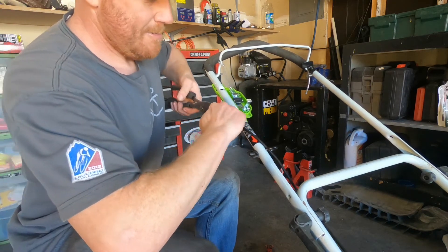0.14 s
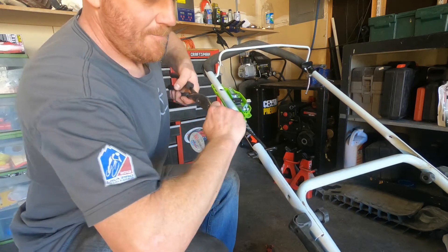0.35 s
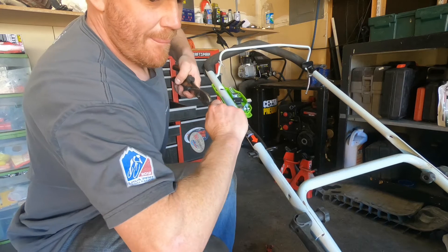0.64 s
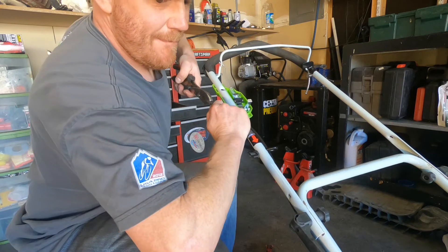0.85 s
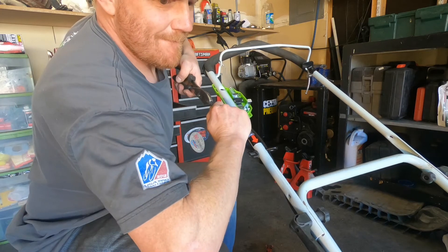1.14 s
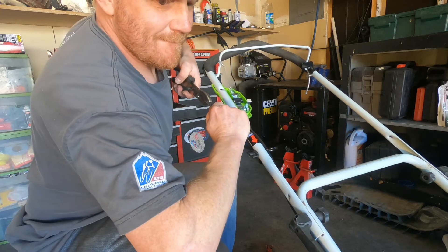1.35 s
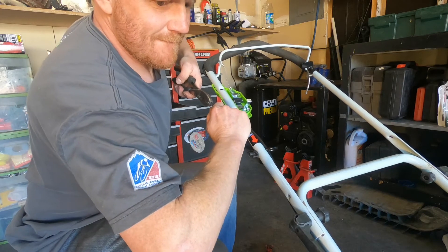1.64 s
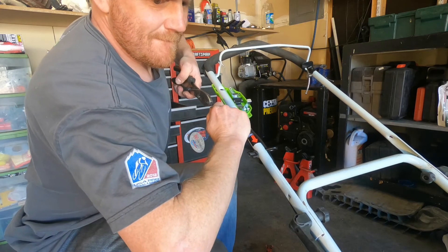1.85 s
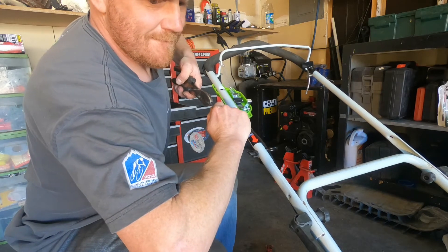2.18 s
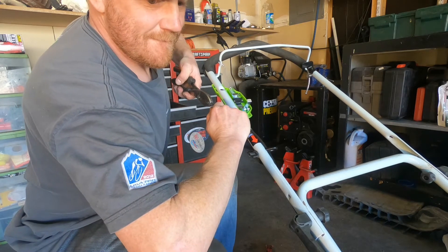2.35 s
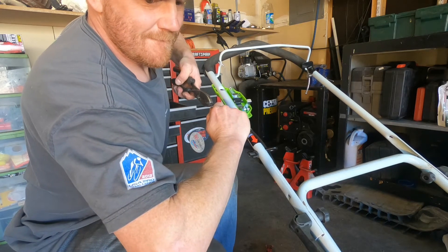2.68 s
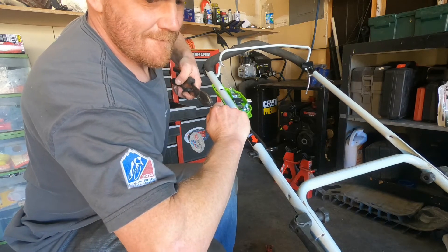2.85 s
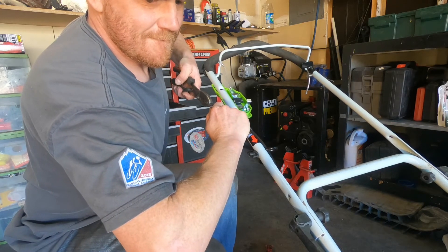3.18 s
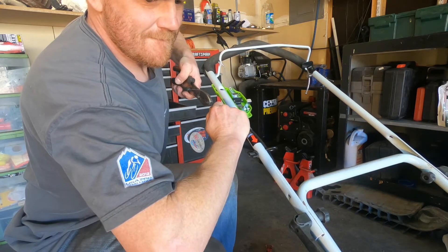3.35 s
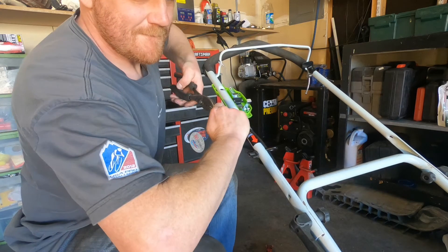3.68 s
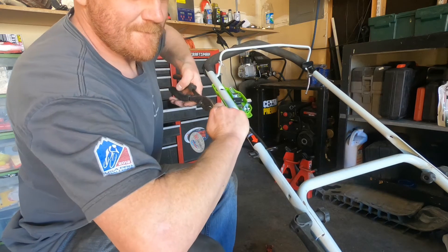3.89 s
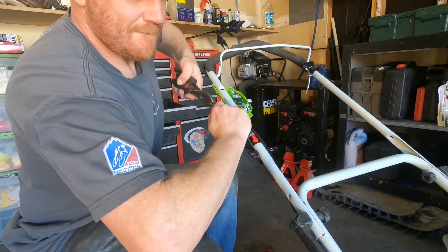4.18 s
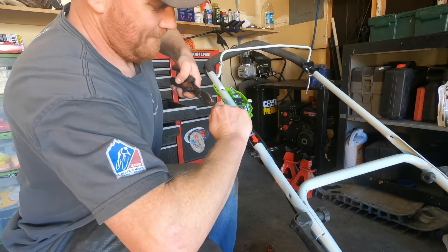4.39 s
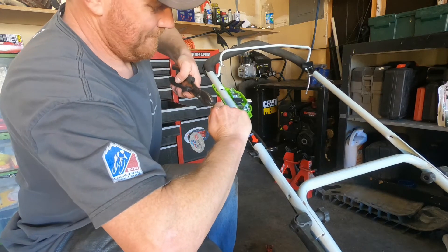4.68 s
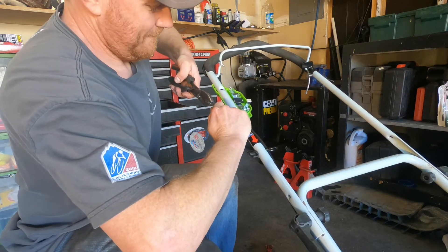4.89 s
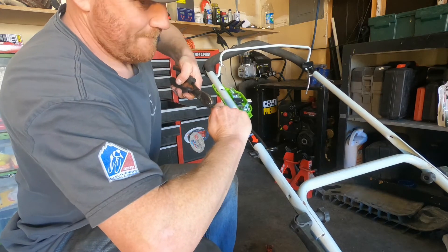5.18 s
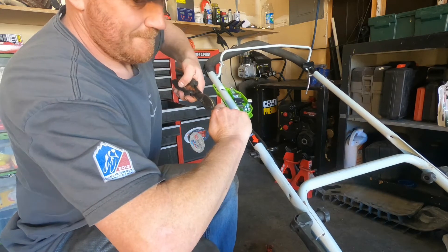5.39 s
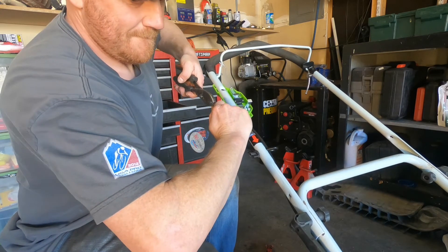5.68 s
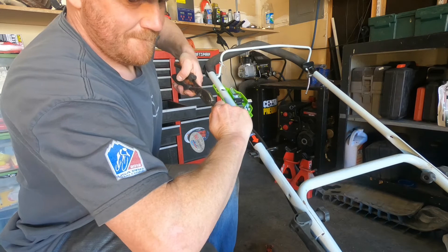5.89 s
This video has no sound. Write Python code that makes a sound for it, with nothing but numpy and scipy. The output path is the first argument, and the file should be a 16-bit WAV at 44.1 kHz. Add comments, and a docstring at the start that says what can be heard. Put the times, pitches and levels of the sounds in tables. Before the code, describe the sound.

Close in a garage, faint scrapes and dull bumps on the right lead to a hard clack. An electric mower starts, knocking slowly then faster, booming in its deck as hum and rushing air climb to full speed. The brake stops it abruptly with a shudder and clacks. After a near-quiet pause and another clack, a second spin-up is cut short, ending in sharp mechanical clacks.

```python
"""In a garage, an electric lawn mower is switched on twice by someone working at its handle with a hand tool.
A clack, then the blade spins up: it knocks once a turn, booms in the deck, hums and throws a rush of air.
The brake stops it hard; the second start is cut short. Struck modes and a noise tail follow each clack.
Dull bumps on the right and light scrapes come mostly at the start. Shaped noise and shaft orders follow
one computed shaft speed, heard by two microphone ports."""
import sys
import numpy as np
from scipy import signal
from scipy.fft import rfft, irfft
from scipy.io import wavfile
from scipy.ndimage import uniform_filter1d

SR = 44100
rng = np.random.default_rng(int(sys.argv[2]) if len(sys.argv) > 2 else 0)


def file_out(sig):
    """Save sig as 16-bit WAV at sys.argv[1]."""
    # one column per channel
    cols = np.atleast_2d(sig).T
    # limit, then scale
    lim = np.clip(cols, -1, 1)
    pcm = np.round(lim * 32767).astype(np.int16)
    wavfile.write(sys.argv[1], SR, pcm)


N = 266011
TIME, FREQ = np.arange(N) / SR, np.maximum(np.fft.rfftfreq(N, 1 / SR), 1)

# each run of the motor: switched on t/s, brake grabs t/s, brake jolt level/dB, shaft hum level/dB
RUNS = [(0.859, 3.49, -24.5, 0.5), (4.395, 5.287, -27, -15)]
FULL_SPEED = 100.4  # turns per s
RELEASE_S = 0.22  # the motor's pull dies away over this time


def undb(db):
    """Decibels to gain."""
    return 10 ** (np.asarray(db) / 20)


def over_hz(points):
    """Join (f/Hz, value) points on a log-frequency axis."""
    hz, value = np.transpose(points)
    return np.interp(np.log(FREQ), np.log(np.maximum(hz, 1)), value)


def resonance(hz, width_hz, at_hz=FREQ):
    """Gain of one resonance at the given frequencies."""
    return 1 / np.hypot(1, (at_hz / hz - hz / at_hz) * hz / width_hz)


def resonances(modes):
    """Summed gain of (f/Hz, width/Hz, level/dB) modes, each a squared resonance."""
    return sum(undb(db) * resonance(hz, width) ** 2 for hz, width, db in modes)


def below(hz):
    """Gain of a steep low-pass."""
    return 1 / np.hypot(1, (FREQ / hz) ** 6)


def above(hz):
    """Gain of the matching high-pass."""
    return np.sqrt(1 - below(hz) ** 2)


def noise(gain):
    """Two unrelated noises of rms 1 with this gain over frequency."""
    x = irfft(rfft(rng.standard_normal((2, N))) * gain, N)
    return x / x.std()


def walk(rate):
    """Two random wanderings of spread 1, no faster than about rate Hz."""
    return noise(below(rate))


def fade(start, t60, rise=0.00055):
    """Envelope of something struck at start: a quick rise, then an exponential decay."""
    age = np.maximum(TIME - start, 0)
    return (1 - np.exp(-age / rise)) * undb(-60 * np.minimum(age / t60, 4))


def ramp(x, lo, hi):
    """Straight line from 0 at lo to 1 at hi, held beyond."""
    return np.clip((x - lo) / (hi - lo), 0, 1)


def standing_waves(spacing_hz, depth_db):
    """Reflections in the garage lift and sink narrow bands; gliding tones swell as they cross them."""
    knots = np.arange(0, SR / 2 + 100, spacing_hz)
    gain = undb(depth_db * np.interp(FREQ, knots, rng.standard_normal(len(knots))))
    return gain / np.sqrt(np.mean(gain ** 2))


def still_garage():
    """The faint noise floor of the still garage."""
    # colour: f/Hz, relative level/dB
    garage_colour = [(25, -0.5), (50, -2.5), (85, -18.5), (175, -1), (400, -11), (700, -13.5),
                     (1000, -20.5), (2200, -24), (4000, -27), (6300, -28), (10000, -41.5), (15000, -53)]
    return undb(-61.5) * noise(undb(over_hz(garage_colour)))


def early_hiss():
    """A faint treble hiss swells and sinks around 0.3 s: band noise under a bell-shaped envelope."""
    # middle t/s, level/dB, half-length to 1/e /s, centre f/Hz, width/Hz
    hiss_swell = (0.3, -68, 0.35, 3000, 3200)
    middle, db, length, hz, width = hiss_swell
    return undb(db) * np.exp(-((TIME - middle) / length) ** 2) * noise(resonance(hz, width) ** 2)


def bumps(thud_t60=0.2):
    """Dull bumps on the right: a low thud and a few booming modes, some damped sooner than others."""
    # soft bumps: t/s, relative level/dB, ring t60/s
    bump_list = [(0.297, -31, 0.36), (0.527, -25, 0.27), (.555, -32.5, 0.16), (.597, -40, 0.16),
                 (5.829, -48.5, 0.37)]
    # what a bump rings with: f/Hz, relative level/dB, share of the ring t60
    bump_modes = [(40, -17, 4.5), (71.5, 3, 1.1), (154, -8.5, 1.2), (191, -1.5, 0.54)]
    thud_colour = [(20, -39), (45, 7.5), (80, 1.5), (115, -22), (175, -2.0), (300, -10.5), (600, -30.0),
                   (2000, -78)]
    thud = noise(undb(over_hz(thud_colour)))
    out = 0
    for start, db, ring_t60 in bump_list:
        boom = 0
        for hz, mode_db, share in bump_modes:
            tone = np.sin(2 * np.pi * hz * (TIME - start))
            boom = boom + undb(mode_db) * tone * fade(start, share * ring_t60, rise=0.027)
        struck = undb(-1.5) * thud * fade(start, thud_t60, rise=0.002)
        out = out + undb(db) * (struck + undb(3.0) * boom)
    return out * undb(np.array([[-7], [3.5]]))  # left, right


def scrapes_and_ticks(grain_db=4, rise_s=0.002):
    """Light scrapes at the start, then short ticks and knocks as the mower starts up: grainy bursts of band noise."""
    # scrapes, ticks and knocks: t/s, relative level/dB, decay to 1/e /s, centre f/Hz, width/Hz
    burst_list = [(0.17, -52, 0.065, 545, 200), (0.19, -60, 0.053, 2780, 700),
                  (0.208, -56.5, 0.044, 1870, 350), (0.21, -60, 0.008, 2620, 500),
                  (0.25, -49, 0.035, 645, 380), (0.265, -48.5, 0.016, 1550, 600),
                  (0.286, -55.5, 0.025, 1350, 800), (0.565, -54, 0.025, 2000, 1200),
                  (0.91, -49, 0.0049, 3640, 3000), (1.073, -49, 0.012, 1320, 1110),
                  (1.121, -48, .007, 1700, 1200), (4.446, -46, .012, 715, 480)]
    bursts = 0
    for start, db, length, hz, width in burst_list:
        envelope = fade(start, length * np.log(1000), rise=rise_s)
        bursts = bursts + undb(db) * envelope * noise(resonance(hz, width) ** 2)
    return bursts * undb(grain_db * walk(170)[0] - 4.5)


def clacks(crack_t60=0.038, room_t60=0.46, treble_t60=0.32, low_t60=0.6, low_late_s=0.0036, build_cycles=1.8):
    """Each clack: a short crack, the mower's struck modes, and the garage's tail; the lows swell late."""
    # clacks of the switch, the mechanism and the tool: t/s, relative ring level/dB,
    # relative noise level/dB, treble over that noise/dB, crack over the tail/dB
    clack_list = [(0.552, -48, -51, -17.5, 14.5), (0.725, -26, -34, -10.5, 7.5),
                  (3.713, -28.5, -30.5, -18, 14), (3.818, -31, -40, -26, 16), (3.875, -59, -49, -39, 6),
                  (4.14, -58, -48, -19.5, 9), (4.252, -25, -34.5, -12.5, 9.5), (4.446, -64, -56, -32, -5),
                  (5.289, -23, -27.5, -13.5, 11), (5.794, -26.5, -35, -10.5, 7.5)]
    # colour of a clack: f/Hz, relative level/dB
    clack_colour = [(90, -43), (170, 9), (380, 4.5), (480, 1), (600, -10), (720, -6), (950, -13),
                    (1500, -15), (1900, -14.5), (2550, -24), (3100, -24.5), (4300, -26.5), (6000, -21.5),
                    (8700, -33.5), (15000, -53)]
    # what the mower rings with when struck: f/Hz, relative level/dB, t60/s
    body_modes = [(184.8, 4.5, 0.52), (273.3, 5, 0.17), (356.7, 7.5, 0.29), (418, -7, 0.55),
                  (453, 5.5, 0.2), (508, -2.5, 0.25), (698, 6, 0.15), (1102, -1.5, 0.33), (1508, 0.5, 0.31),
                  (1680, -2, 0.24), (1876, 1.5, 0.14), (1870, -7, 0.44), (2116, -7, 0.36),
                  (2808, -17, 0.15)]
    colour = undb(over_hz(clack_colour))
    low = noise(colour * below(570))
    middle = noise(colour * above(491) * below(3400))
    treble = noise(colour * above(2640))
    age = TIME[:SR]
    out = np.zeros((2, N))
    for start, ring_db, body_db, treble_db, crack_db in clack_list:
        crack = undb(crack_db) * fade(start - .002, crack_t60, rise=0.0012)
        out += undb(body_db - 6.0) * low * fade(start + low_late_s, low_t60, rise=0.0022)
        out += undb(body_db - 5.0) * middle * (crack + fade(start, room_t60, rise=0.0027))
        out += undb(body_db + treble_db - 0.5) * treble * (crack + fade(start, treble_t60, rise=0.0077))
        ring = 0
        for hz, db, t60 in body_modes:
            # each strike detunes the mode slightly and starts it at its own phase
            cycles = hz * age * (1 + 0.004 * rng.standard_normal()) + rng.random()
            build = 1 - np.exp(-age * hz / build_cycles)
            ring = ring + undb(db - 60 * age / t60) * build * np.sin(2 * np.pi * cycles)
        first = int(start * SR)
        out[:, first:first + SR] += undb(ring_db - 20.5) * ring[:N - first]
    return out


def blade_ring(start=3.8, hz=300, t60=4):
    """The steel blade rings on faintly after the brake has grabbed: one slowly decaying sine."""
    return undb(-55.0) * np.sin(2 * np.pi * hz * TIME) * fade(start, t60, rise=0.035)


def brake_jolts(t60=0.43):
    """Each time the brake grabs, the whole chassis shudders: low noise that dies away."""
    shudder_colour = [(60, -42), (100, -10), (165, 10.5), (250, -10), (450, 3.0), (650, 3.5), (1000, -35),
                      (3000, -60)]
    shudder = noise(undb(over_hz(shudder_colour)))
    return shudder * sum(undb(db) * fade(off, t60, rise=0.0017) for _, off, db, _ in RUNS)


def shaft():
    """Speed (turns per s), angle (turns) and the motor's pull (0-1): a steady climb, a level top, a hard stop."""
    # the climb hesitates: t/s after switch-on, half-length to 1/e /s, speed lost/(turns per s)
    hesitation = (1.12, .22, 2.2)
    slow_at, slow_s, lost = hesitation
    spin_up_rate = 61  # turns per s, each s: the controller raises the speed steadily
    level_off = 7.6  # sharpness of the bend into full speed
    waver_hz, waver_share = 9, .007  # the fast shaft wavers by this share of its speed
    brake_delay_s, brake_s = 0.0276, 0.5  # delay before the brake bites, time constant of its drag
    friction = 100 * brake_s  # dry friction slows the shaft by a further 100 turns per s, each s
    speed, turns, pulling = np.zeros((3, N))
    for on, off, _, _ in RUNS:
        climb = spin_up_rate * np.clip(TIME - on, 0, off - on)
        driven = climb / (1 + (climb / FULL_SPEED) ** level_off) ** (1 / level_off)
        driven = driven - lost * np.exp(-((climb / spin_up_rate - slow_at) / slow_s) ** 2)
        driven = driven * (1 + waver_share * walk(waver_hz)[0] * ramp(driven, 38.4, 60.7))
        braked_s = np.maximum(TIME - off - brake_delay_s, 0)
        run = np.maximum((driven + friction) * np.exp(-braked_s / brake_s) - friction, 0)
        speed = speed + run
        turns = turns + np.cumsum(run) / SR * (run > 0)
        pulling = pulling + (TIME > on) * (1 - ramp(TIME, off, off + RELEASE_S))
    return speed, turns, pulling


def loudness(law, speed, pulling):
    """Level in dB of a layer that grows as a power of the speed and changes as the motor's pull dies away."""
    full_db, slope_db, released_db = law
    return full_db + slope_db * np.log10(np.maximum(speed / FULL_SPEED, 1e-4)) + released_db * (1 - pulling)


def shaft_tone(turns, order, smear):
    """One multiple of the shaft rate: a steady part and a share smeared by turbulence."""
    smear = np.clip(smear, 0, .9)
    angle = 2 * np.pi * (order * turns + rng.random())
    steady = np.sqrt(2 * (1 - smear ** 2)) * np.sin(angle)
    return steady + smear * (walk(24 + order) * np.sin(angle) + walk(11 + 2 * order) * np.cos(angle))


def drive_whine(speed, pulling, buzz_db=-56.5, glide_hz=40):
    """As the motor pulls up from rest, its controller sings and hisses faintly; the housing buzz rises a little."""
    starting = pulling * ramp(speed, 1, 15.0) * (1 - ramp(speed, 33.0, 69))
    whine = undb(-77.5) * ramp(speed, 0, 21) * noise(resonance(9950, 200) ** 2)
    sizzle = undb(-68.5) * noise(resonance(6000, 2700) ** 2)
    buzz_hz = 575 + glide_hz * ramp(speed, 3.32, 17)
    buzz = undb(buzz_db) * shaft_tone(np.cumsum(buzz_hz) / SR, 1, 0.65)
    rough = undb(-56) * noise(resonance(548, 150) ** 2)
    return starting * (whine + sizzle + buzz + rough)


def hum(speed, turns, pulling, waver=0.26, smear_per_order=0.089, upper_db=-2.0, released_db=-30,
        third_throb=0.26, third_smear=0.28, beat_db=2.0):
    """Shaft orders, the second strongest from the two blade ends, beating on the climb; they fade with the pull."""
    # weaker tones: multiple of the shaft rate, relative level/dB
    weaker_tones = [(1, -45.5), (4, -38.5), (5, -41), (6, -40.5), (7, -46), (8, -37.5), (10, -40.5),
                    (12, -42), (14, -41.5), (16, -45), (18, -45), (20, -48.5), (24, -46)]
    # resonances that lift the tones gliding through: f/Hz, width/Hz, level/dB
    lifts = [(100, 8, -3), (125, 3.2, -12.5), (176.3, 10, 6), (192.2, 10.2, 3), (256.8, 8.7, 17),
             (289, 8.6, 2), (353, 25, 4), (461, 23, 5.5), (528, 20, -6), (596, 19, -4.5), (820, 40, -1.5),
             (1035, 32, 2.5)]
    blade_db, third_db = -35, -43  # second and third order, relative levels
    surge_hz, surge_db = 8, 2.8  # each weaker tone swells and sinks on its own
    # the blade tone throbs while the speed settles: strongest at, lasting about, rate, depth
    throb_at_s, throb_span_s, throb_hz, throb_depth_db = 2.712, 0.48, 4.18, 5

    drive = (speed / FULL_SPEED) ** 0.27 * undb(released_db * (1 - pulling))
    sounding = 0
    for on, off, _, hum_db in RUNS:
        fading = 1 - ramp(TIME, off + RELEASE_S, off + 2 * RELEASE_S)
        sounding = sounding + undb(hum_db) * (TIME > on) * fading
    drive = drive * sounding

    upper = 0
    for order, db in weaker_tones:
        surge = undb(db + surge_db * walk(surge_hz)[0])
        upper = upper + surge * shaft_tone(turns, order, waver + smear_per_order * order)
    upper = rfft(drive * ramp(speed, 43.0, 81) * upper)
    upper = upper * above(39) * standing_waves(spacing_hz=7.7, depth_db=3.5)

    settling = TIME - throb_at_s
    throb_db = throb_depth_db * np.cos(2 * np.pi * throb_hz * settling)
    throb_db = throb_db * np.exp(-(settling / throb_span_s) ** 4)
    blade = undb(blade_db + throb_db) * shaft_tone(turns, 2, waver)
    # the extra smear of the third order grows as the speed falls from 110 to 96 turns per s
    third = shaft_tone(turns, 3, waver + third_smear * ramp(speed, 110, 96))
    third = undb(third_db + third_throb * throb_db) * third
    beating = undb(beat_db * walk(9.7)[0] * (1 - ramp(speed, 68, 83)))
    main = rfft((blade + third) * drive * ramp(speed, 39.3, 72.4) * beating)
    lift = 1 + resonances(lifts)
    return irfft(main * lift + undb(upper_db) * upper * lift ** above(244), N)


def knocks(turns, speed, knock_s=0.0065, soft_s=0.0017, rebound=0.27, scatter_db=0.8):
    """The slow shaft knocks once a turn and rebounds half a turn later, varying in size; speed blurs the knocks."""
    halves = 2 * (turns + 0.45)
    stroke = halves.astype(int)
    size = undb(scatter_db * rng.standard_normal(2048))[stroke] * np.where(stroke % 2, rebound, 1)
    since = halves % 1 / np.maximum(2 * speed, 1)  # s since the last stroke
    blur = 1 / (1 + (speed / 39) ** 4)
    return size * np.exp(-since / knock_s) * (1 - np.exp(-since / soft_s)) * blur * (speed > 0)


def clatter(speed, turns, pulling):
    """Each knock of the shaft rings the housing briefly: resonant noise gated by the knocks."""
    # housing resonances: f/Hz, width/Hz, relative level/dB
    housing_modes = [(970, 170, 1.5), (1460, 240, -3), (1780, 220, -9), (2160, 140, -6)]
    # relative level: at full speed/dB, per tenfold speed/dB, level change as the motor's pull dies away/dB
    clatter_law = (-18, 37, -22)
    housing = noise(resonances(housing_modes))
    return housing * knocks(turns, speed) * undb(loudness(clatter_law, speed, pulling))


def knocking(turns, speed, depth=2.3, rattle_db=1.2):
    """The rush of air flutters with the knocks and rattles a little, its level evened over 0.1 s."""
    rattle = undb(rattle_db * walk(160)[0] * (1.0 - ramp(speed, 53, 95)))
    gate = (1 + depth * knocks(turns, speed)) * rattle
    return gate / np.sqrt(uniform_filter1d(gate ** 2, size=4410))


def air(speed, turns, pulling, chop=0.092):
    """Air torn by the blade tips pulses at each blade pass; a higher hiss band opens near full speed."""
    # air under the deck with the blade slow: f/Hz, relative level/dB
    slow_air = [(140, -21), (240, -2), (350, -3.5), (480, -6.5), (600, -7), (740, -14.5), (1020, -6.5),
                (1300, -15), (1900, -14.5), (3000, -32), (4400, -33), (5700, -29.5), (7500, -35.5),
                (10000, -45), (12000, -54.5), (15000, -64)]
    # air under the deck with the blade at full speed: f/Hz, relative level/dB
    fast_air = [(200, -24), (320, -2.5), (365, -8), (425, -6.5), (520, -2.5), (605, 1), (680, -12),
                (800, -2.5), (1050, -2), (1600, -6), (2500, -10.5), (3400, -15), (4600, -20), (5600, -13.5),
                (7500, -14), (8600, -23), (10500, -27.5), (12800, -39.5), (15000, -59)]
    # turbulence behind the fast blade: f/Hz, relative level/dB
    buffet_colour = [(25, -20), (55, 2.5), (100, 5), (150, 8), (250, 14.5), (450, 3.5), (700, -31.5)]
    # relative levels of rush and hiss: at full speed/dB, per tenfold speed/dB,
    # level change as the motor's pull dies away/dB
    rush_law = (-27, 32.6, -7)
    hiss_law = (-34.5, 48.8, -13)
    ripple = standing_waves(spacing_hz=23.98, depth_db=1.6)
    slow, fast = undb(over_hz(slow_air)) * ripple, undb(over_hz(fast_air)) * ripple
    # the slow colour gives way to the fast one, the treble later than the rest
    full, shrill = ramp(speed, 43.0, 89.4), ramp(speed, 82.6, 94.0)
    rush = np.sqrt(1 - full) * undb(2.0) * noise(slow * below(4300))
    rush = rush + np.sqrt(full) * undb(-2.0) * noise(fast * below(3930))
    hiss = np.sqrt(1 - shrill) * undb(0.08) * noise(slow * above(2730))
    hiss = hiss + np.sqrt(shrill) * noise(fast * above(3060))
    rush = rush * undb(loudness(rush_law, speed, pulling)) * ramp(speed, 0.93, 24) * knocking(turns, speed)
    hiss = hiss * undb(loudness(hiss_law, speed, pulling))
    passes = 1 + chop * np.cos(4 * np.pi * turns)  # two blade ends a turn
    buffet = noise(undb(over_hz(buffet_colour))) * undb(-38.0) * ramp(speed, 57, 78)
    return passes * (rush + hiss) + buffet


def deck(speed, turns, pulling, evenness=0.19, random_db=-3.5, swell_db=-5.5, swell_hz=182,
         swell_width_hz=17, ring_s=0.023):
    """The deck booms at its own pitch, struck once a turn, swells when blows fall in step, and calms at speed."""
    # deck resonances: f/Hz, width/Hz, relative level/dB
    deck_modes = [(182.2, 22, -1), (279, 22, -12)]
    # relative level: at full speed/dB, per tenfold speed/dB, level change as the motor's pull dies away/dB
    deck_law = (-23.5, 30.9, -2.5)
    boom = noise(resonances(deck_modes))
    # even out part of the boom's random swings
    swing = np.sqrt(uniform_filter1d(boom.mean(axis=0) ** 2, size=1500))
    boom = boom / (swing + 0.056) ** evenness
    # one impulse a turn drives the main mode
    blows = np.clip(np.diff(np.floor(turns + 0.45), prepend=0), 0, 1) / np.sqrt(speed + 1) * (speed < 75)
    detuning = (FREQ / swell_hz - swell_hz / FREQ) * swell_hz / swell_width_hz
    swell = irfft(rfft(blows) / (1 + 1j * detuning) ** 2, N)
    calming = 1 - pulling ** 4 * ramp(speed, 39, 84.5)
    shake = undb(loudness(deck_law, speed, pulling)) * calming
    # the boom cannot stop faster than the deck rings down
    step = 1 / (ring_s * SR)
    ringing = signal.lfilter([step], [1, step - 1], shake)
    boom = undb(random_db) * boom / boom.std()
    swell = undb(swell_db) * pulling * ramp(speed, 3, 23) * swell / swell.std()
    return np.maximum(shake, ringing) * (boom + swell)


def ports(pair):
    """Sound from one side reaches the ports at different times and levels; the diffuse part is unrelated."""
    # left minus right: f/Hz, level/dB
    port_balance = [(60, -0.5), (110, -0.5), (200, -1.5), (380, -5.5), (700, -9.0), (1290, -5.5),
                    (2380, -4.0), (4400, -7.0), (8120, -4.5), (15000, 1)]
    # lead of the left port: f/Hz, phase/rad
    port_phase = [(50, -.2), (200, -.55), (520, -1.3), (950, -3.7), (2760, -4.6), (4600, -5.6),
                  (5000, -8.2), (6000, -8.8), (6400, -6.5), (8000, -6.3)]
    # likeness of the two ports: f/Hz, share 0-1
    port_likeness = [(30, .1), (70, 0.046), (150, 0.62), (300, 1), (550, 0.71), (2000, 0.76), (5000, 0.33),
                     (9000, 0.73)]
    one, other = rfft(pair)
    like = np.clip(over_hz(port_likeness), 0, 1)
    right = undb(-over_hz(port_balance)) * np.exp(-1j * over_hz(port_phase))
    # keeps the level of the two ports' sum
    centre = np.sqrt(1 + np.abs(right) ** 2 + 2 * like * right.real) / 2
    diffuse = (other - one) / np.sqrt(2)
    common = (other + one) / np.sqrt(2)
    shared, apart = np.sqrt((1 + like) / 2) * common, np.sqrt((1 - like) / 2) * diffuse
    return irfft(np.array([shared + apart, right * (shared - apart)]) / centre, N)


def scene():
    """The mower, its clacks and the handling noises over the still garage."""
    background = still_garage() + early_hiss() + scrapes_and_ticks()
    background = background + clacks() + blade_ring() + brake_jolts()
    speed, turns, pulling = shaft()
    mower = drive_whine(speed, pulling) + hum(speed, turns, pulling) + clatter(speed, turns, pulling)
    mower = mower + air(speed, turns, pulling) + deck(speed, turns, pulling)
    mower = mower * undb(0.5 * (TIME > RUNS[1][0]))  # the second run is half a dB louder
    return ports(background + mower) + bumps()


def record(dry):
    """The camera cuts the top: a steep elliptic low-pass at 14.9 kHz."""
    return signal.sosfilt(signal.ellip(8, .2, 70, 14900, fs=SR, output="sos"), dry)


dry = scene()
out = record(dry)
file_out(out)
```